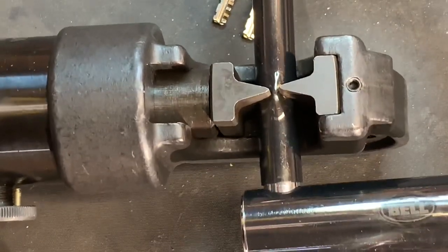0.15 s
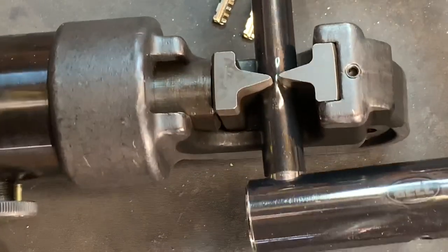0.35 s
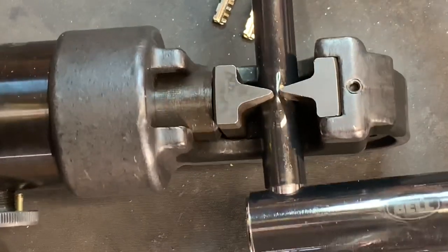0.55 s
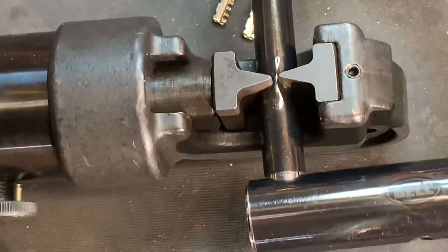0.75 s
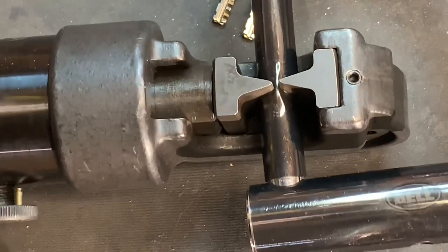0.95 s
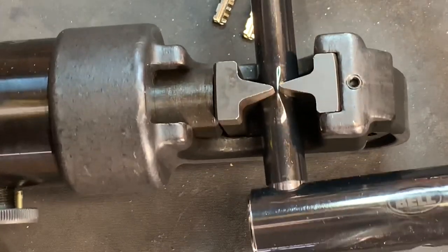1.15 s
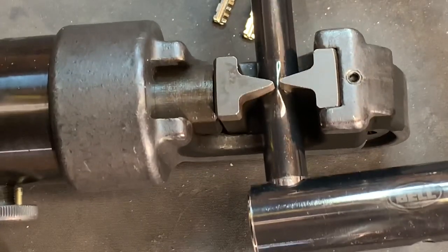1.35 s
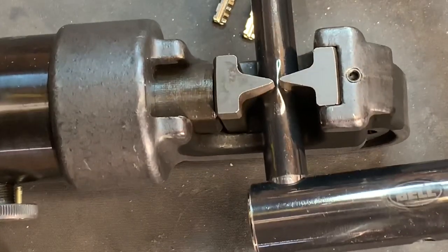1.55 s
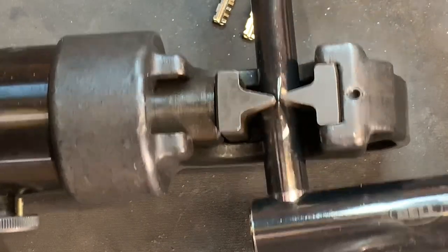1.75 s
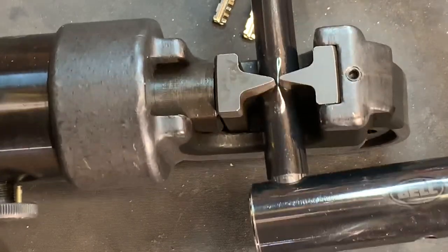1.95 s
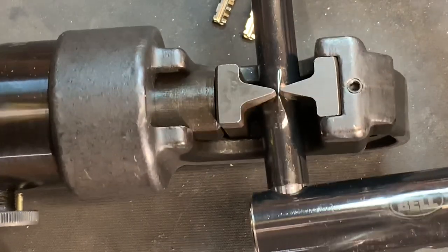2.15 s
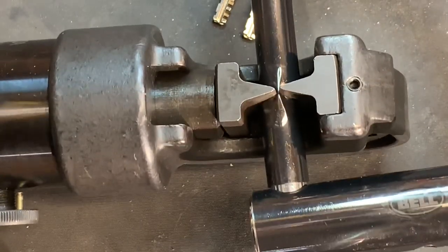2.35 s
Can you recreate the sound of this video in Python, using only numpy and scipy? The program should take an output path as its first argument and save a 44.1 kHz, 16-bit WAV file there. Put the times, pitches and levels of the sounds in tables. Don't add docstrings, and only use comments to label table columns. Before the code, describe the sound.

A loud steel crack rings out as a hand-pumped cutter snaps a shackle in a garage

```python
import sys
import numpy as np
from scipy import signal
from scipy.fft import rfft, irfft
from scipy.io import wavfile
from scipy.ndimage import uniform_filter1d

SR = 44100
rng = np.random.default_rng(int(sys.argv[2]) if len(sys.argv) > 2 else 0)


def natural_amplitude(level_db):
    exponent = np.asarray(level_db, float) / 20
    return 10 ** exponent


def generate_wav(signal):
    frames = np.transpose(np.atleast_2d(signal))
    scaled = np.clip(frames, -1, 1) * 32767
    pcm = np.round(scaled).astype(np.int16)
    wavfile.write(sys.argv[1], SR, pcm)


N = 105840

# pitch_hz, level_db
BOARDS = [(100, -13.5), (230, -0.5), (400, -0.5), (900, -6), (1300, -14), (2500, -24.5), (6000, -37.5)]
STRIKE_SPREAD_DB = 1.5


def evened(x):
    return x / np.sqrt(np.mean(x ** 2) + 1e-20)


def read(points, hz):
    f, value = np.transpose(points)
    return np.interp(np.log(hz + 1), np.log(f + 1), value)


def add(mix, start_s, sound):
    part = mix[round(start_s * SR):][:len(sound)]
    part += sound[:len(part)]


def ring(modes, spread_db=0, tilt_db=0, seconds=.7):
    t = np.arange(round(seconds * SR)) / SR
    out = np.zeros(len(t))
    for hz, db, t60 in modes:
        level_db = db + tilt_db * (hz > 8000) + spread_db * rng.standard_normal()
        out += natural_amplitude(level_db - 60 * t / t60) * np.sin(2 * np.pi * hz * t)
    return out


def coloured(points, size):
    spectrum = rfft(rng.standard_normal(size))
    gain = natural_amplitude(read(points, np.fft.rfftfreq(size, 1 / SR)))
    return evened(irfft(spectrum * gain, size))


def flutter(size, smooth):
    return evened(uniform_filter1d(rng.standard_normal(size), smooth))


def dying(x, t60s):
    hz, t, z = signal.stft(x, SR, nperseg=256)
    decay = natural_amplitude(-60 * t / read(t60s, hz)[:, None])
    return signal.istft(z * decay, SR, nperseg=256)[1][:len(x)]


def blow(length_s):
    push = np.hanning(max(round(length_s * SR), 4))
    return push / push.sum()


def garage():
    # pitch_hz, level_db
    air_colour = [(88, -51), (150, -16), (360, -1), (390, -15), (473, -7.5), (685, -17), (866, -14.5),
                  (1680, -20), (15800, -29.5)]
    air_db = -61.5
    # pitch_hz, level_db
    hum_tones = [(120, -59.5), (240, -71), (360, -67.5), (480, -68.5), (600, -72.5), (720, -77.5),
                 (6600, -81)]
    rumble_db, rumble_hz, lump_db = -46, 33, 2.5
    t = np.arange(N) / SR
    air = natural_amplitude(air_db) * coloured([(80, -30.0)] + list(air_colour), N)
    hum = np.zeros(N)
    for hz, db in hum_tones:
        hum += natural_amplitude(db + 0.5) * np.sin(2 * np.pi * (hz * t + rng.random()))
    lumps = evened(uniform_filter1d(flutter(N, 3000), 3000))
    rumble = coloured([(5, -8), (15, 0), (rumble_hz, 0), (50, -8), (80, -26), (150, -30), (300, -60)], N)
    return air + hum + rumble * natural_amplitude(rumble_db + lump_db * lumps)


def room(x):
    # pitch_hz, t60_s
    room_t60 = [(300, 0.4), (2000, 0.42), (6000, 0.38), (15000, 0.15)]
    taps = np.zeros(SR // 2)
    at = np.arange(200, len(taps) - 20, 20)
    taps[at + rng.integers(0, 20, len(at))] = rng.choice([-1., 1.], len(at))
    tail = dying(taps, room_t60)
    return signal.fftconvolve(x, tail / np.linalg.norm(tail))[:N]


def rubs():
    starts = [.95, 1.68, 1.575, 2.24, .065, .885]
    lengths = [.09, .065, .07, .22, .17, .07]
    # level_db, broad_part_db
    strengths = [(-58, -11.5), (-59, -14), (-66, 2.5), (-66, 5.5), (-50.5, -3.5), (-69, 4)]
    # pitch_hz, width_hz, level_db
    valve = [(2640, 700, -6), (3400, 800, -8), (4600, 600, -2)]
    out = np.zeros(N)
    for start_s, length_s, (db, broad_db) in zip(starts, lengths, strengths):
        size = round(length_s * SR)
        grit = coloured([(300, 16), (1500, -6.5), (5000, -13), (15000, -9.0)], size)
        grit *= natural_amplitude(2.2 * flutter(size, 150))
        tuned = np.zeros(size)
        for hz, width_hz, valve_db in valve:
            tuned += natural_amplitude(valve_db) * evened(signal.lfilter(*signal.iirpeak(hz, hz / width_hz, SR), grit))
        add(out, start_s, natural_amplitude(db) * signal.windows.tukey(size, .5) * (tuned + natural_amplitude(broad_db) * grit))
    return out


def keys():
    # start_s, level_db, treble_tilt_db, scrape_db, damping_factor
    jingles = [(.0692, -32, -1, 2, 1), (.0857, -41, 21, 10, 1.8), (.096, -42, 12, 4, 1.6),
               (.1092, -25, 3, 2, 1), (.129, -43, 8, 4, 1), (.233, -9, -3, -40, .75),
               (.880, -37, -16, -13, 1), (.936, -66, 15, -10, 1.6), (.6609, -69, 21, -14, 1.1),
               (1.043, -66, 18, 20, 2), (1.059, -63, 18, 8, 2), (1.744, -64, 19, 16, 1.8),
               (1.785, -72, 17, -2, 2)]
    # pitch_hz, level_db, t60_s
    brass = [(7170, -10, .2), (7245, -6, .3), (7210, -1, .035), (10010, -17, .15), (10090, -11, .13),
             (10050, -2, .025), (11750, -12, .06), (12600, -12, .04), (15090, -12, .06), (15350, -13, .06)]
    swell_s = .001
    scrape_colour = [(800, -2), (2800, 5.5), (5000, 3), (6500, -10), (8500, -12.5), (10500, -3.5),
                     (15000, -6.5)]
    out, t = np.zeros(N), np.arange(round(.4 * SR)) / SR
    for start_s, db, tilt_db, scrape_db, damping in jingles:
        scrape = coloured(scrape_colour, len(t)) * natural_amplitude(scrape_db - 60 * t / .06)
        scrape *= np.minimum(t / 0.0011, 1)
        damped = [(hz, level_db, t60 / damping) for hz, level_db, t60 in brass]
        tones = ring(damped, spread_db=STRIKE_SPREAD_DB, tilt_db=tilt_db, seconds=.4)
        add(out, start_s, natural_amplitude(db) * (scrape + (1 - np.exp(-t / swell_s)) * tones))
    return out


def tube():
    # start_s, level_db
    bounces = [
        (.29, -15.5),
        (1.078, -42),
        (1.781, -43),
    ]
    # pitch_hz, level_db, t60_s
    tube_modes = [(1168, 1, .27), (1195, -10, .14), (1286, -9, .16)]
    rise_s = .01
    out, t = np.zeros(N), np.arange(SR // 2) / SR
    for start_s, db in bounces:
        add(out, start_s, natural_amplitude(db) * (1 - np.exp(-t / rise_s)) * ring(tube_modes, seconds=.5))
    return out


def clicks():
    # start_s, level_db, pitch_hz,
    # bright_crack_db, clean_ring_db
    small_clicks = [(0.046, -32, 3010, 3, -4), (0.8423, -49, 2570, -11, -10), (0.87, -31.5, 3110, 1, -2),
                    (.880, -35.5, 2600, 4, -12), (1.0281, -30.5, 4700, -6, -27), (1.5613, -33, 8200, 5, -28),
                    (1.563, -38.5, 3170, -7, -15), (1.7311, -31, 4980, -6, -30), (0.44, -43.5, 12300, 7.5, -21.5),
                    (0.956, -53, 2300, -8, -20), (1.042, -35, 9770, -10, -10.5), (1.7435, -36, 10200, -1, -1),
                    (.1092, -24.5, 3400, -6, -19), (0.069, -31, 2900, -16, -12),
                    (1.3668, -48.5, 4600, -10, -40), (1.645, -57, 11700, -14, -2), (1.851, -52, 11700, -8, -2),
             (.661, -60, 12450, -14, 8), (.6025, -50, 5000, -12, -40), (1.292, -58, 2800, -8, -40),
             (2.08, -62, 9000, 0, -40), (1.61, -58, 5200, -6, -6), (1.5394, -51, 2600, -6, -20),
             (1.0755, -35, 750, -40, -2), (1.7785, -39, 750, -40, -2), (1.079, -45, 2030, -22, -10),
             (1.779, -45, 2010, -22, -10), (.0335, -48, 2800, -12, -12), (.558, -53, 3100, -6, -30),
             (1.031, -36, 2620, -30, 4), (1.734, -36, 2650, -30, 4), (1.564, -38, 3100, -30, 4)]
    # pitch_hz, level_db
    snap_colour = [(300, -8.5), (1500, 1), (3500, -2.5), (8000, -1.5), (15000, -7.5)]
    snap_t60, cluster_t60, clean_t60 = 0.025, 0.061, .02
    width = .22
    size = 4096
    out, t = np.zeros(N), np.arange(size) / SR
    for start_s, db, hz, bright_db, clean_db in small_clicks:
        snap = coloured(snap_colour, size) * natural_amplitude(bright_db - 3.5 - 60 * t / snap_t60)
        cluster_colour = [(hz * (1 - 2 * width), -18), (hz * (1 - width), -8), (hz, 0),
                          (hz * (1 + width), -10), (hz * 1.8, -14), (hz * 2.7, -34)]
        cluster = coloured(cluster_colour, size) * natural_amplitude(-3.0 - 60 * t / cluster_t60)
        clean = np.sin(2 * np.pi * hz * t) * natural_amplitude(clean_db - 60 * t / clean_t60)
        add(out, start_s, natural_amplitude(db) * (snap + cluster + clean))
    return out


def bench():
    # start_s, level_db, blow_length_s, clatter_db
    thuds = [
        (0.252, 3.5, 0.0069, -21.5),
        (.272, -4, 0.0064, -13.5),
        (0.236, -13, 0.0029, -11),
        (0.29, -23, 0.0058, -4.5),
        (1.029, -6, 0.0045, -24.5),
        (1.074, -22, 0.00031, -13),
        (1.7314, -7, 0.0043, -21),
        (1.7804, -21, 0.00057, -18.5),
    ]
    # start_s, level_db
    knocks = [
        (0.0584, -17),
        (.845, -34),
        (0.8736, -18.5),
        (1.54, -35),
        (1.569, -18),
    ]
    # start_s, level_db
    sways = [
        (0.084, -21.5),
        (.394, -16.5),
        (0.518, -28.5),
        (1.156, -23.5),
        (1.284, -34),
        (1.856, -29),
        (1.992, -33.5),
        (0.602, -36.5),
        (1.37, -39),
    ]
    # pitch_hz, level_db, t60_s
    thud_modes = [(26, 2, .2), (47, -3, .09), (116.8, -18, 0.13), (125.75, 0.5, 0.071), (222, -10, 0.16),
                  (391.3, -15, .15), (475.4, -18, .1)]
    # pitch_hz, level_db, t60_s
    knock_modes = [(39.4, -14.5, .2), (127, 1.5, 0.065), (176, -12, 0.1), (786, -2.5, .05)]
    # pitch_hz, level_db, t60_s
    sway_modes = [(33, 0.5, .15), (52, -2, 0.13), (115, -12.5, .08), (185, -14, .1)]
    # pitch_hz, t60_s
    clatter_t60 = [(200, 0.33), (1000, 0.16), (4000, 0.053)]
    knock_blow_s, air_hz = 0.0043, 57
    out, t = np.zeros(N), np.arange(SR // 2) / SR
    for start_s, db, length_s, clatter_db in thuds:
        add(out, start_s, -natural_amplitude(db) * signal.oaconvolve(ring(thud_modes), blow(length_s)))
        clatter = np.minimum(t / .002, 1) * dying(coloured(BOARDS, len(t)), clatter_t60)
        add(out, start_s, natural_amplitude(db + clatter_db) * clatter)
    for start_s, db in knocks:
        knock = signal.oaconvolve(ring(knock_modes), blow(knock_blow_s))
        add(out, start_s - knock_blow_s / 2, -natural_amplitude(db) * knock)
        add(out, start_s, natural_amplitude(db - 23 - 60 * t / 0.054) * coloured(BOARDS, len(t)))
    for start_s, db in sways:
        add(out, start_s, -natural_amplitude(db) * signal.oaconvolve(ring(sway_modes), blow(0.0081)))
    return signal.lfilter(*signal.butter(2, air_hz, "high", fs=SR), out)


def crack():
    # pitch_hz, level_db
    burst_colour = [(120, -29), (200, -0.5), (258, -10.5), (832, -10), (1550, -12), (3790, -6),
                    (5770, -12.5), (7060, -5.5), (15800, -20.5)]
    # pitch_hz, t60_s
    burst_t60 = [(300, .4), (1500, .4), (4000, .37), (6500, .34), (10000, .25), (15000, .21)]
    # pitch_hz, level_db, t60_s
    steel = [(2195, -12.5, 0.25), (3890, -10, .18), (4400, -11.5, 0.3), (5003, -12, .2), (6330, -8, 0.1),
             (6960, -3, 0.16), (7085, -6.5, 0.28), (7240, -6.5, 0.27), (8040, -7.5, .12), (8670, -4, 0.11),
             (9900, -7, .14), (10930, -2, .15), (13190, -14, .12), (15310, -19, .2)]
    start_s, level_db, hold_s = .2309, 2, 0.0092
    ring_db, blur_hz = -14, 80
    out, t = np.zeros(N), np.arange(SR) / SR
    burst = dying(coloured(burst_colour, SR), burst_t60)
    burst *= (1 + 3.5 * np.exp(-t / hold_s)) * natural_amplitude(0.9 * flutter(SR, 130))
    crowd = [(hz + blur_hz * rng.uniform(-1, 1), db - 6, t60) for hz, db, t60 in steel * 5]
    ringing = natural_amplitude(ring_db) * ring(crowd, spread_db=STRIKE_SPREAD_DB, seconds=1.)
    add(out, start_s, natural_amplitude(level_db) * np.minimum(t / 0.00091, 1) * (0.34 * burst + ringing))
    return out


def scene():
    room_db, bench_room_db = -14, -12.5
    low = bench()
    small = clicks() + keys()
    echoes = room(natural_amplitude(room_db) * small + natural_amplitude(bench_room_db) * low)
    return (low + small + tube() + crack() + rubs() + garage() + echoes)[None]


def roll_off(x):
    return signal.sosfilt(signal.butter(12, 15930, fs=SR, output="sos"), x)


def record(dry):
    overloaded = np.clip(dry, -.92, .92)
    edge = signal.firwin(255, 15900, window=("kaiser", 8), fs=SR)[None]
    mix = np.clip(signal.oaconvolve(overloaded, edge, "same"), -1, 1)
    return roll_off(mix)


dry = scene()
out = record(dry)
generate_wav(out)
```